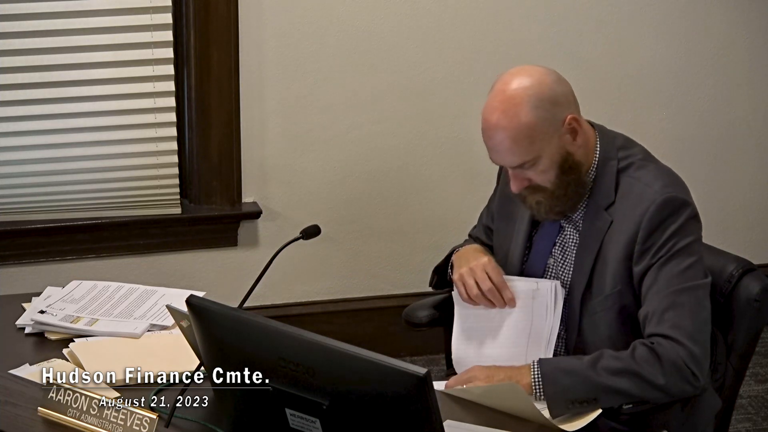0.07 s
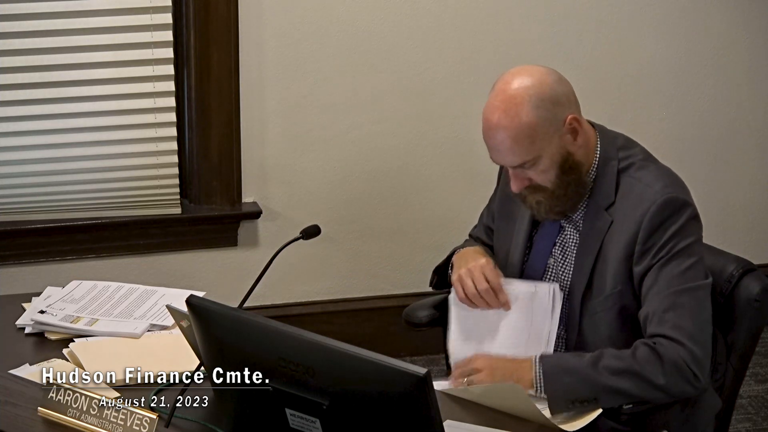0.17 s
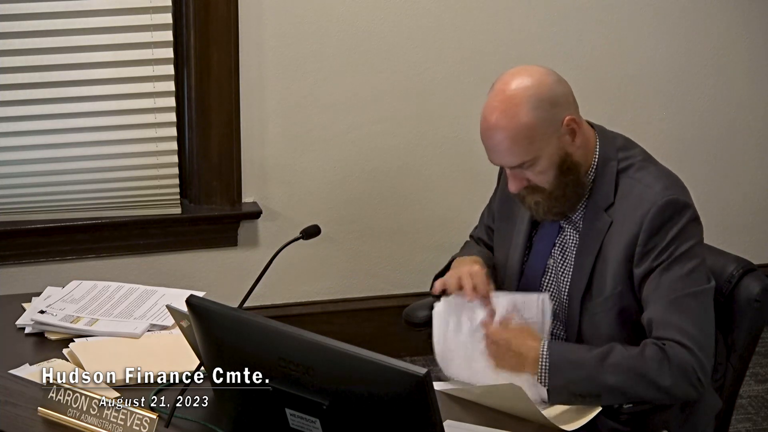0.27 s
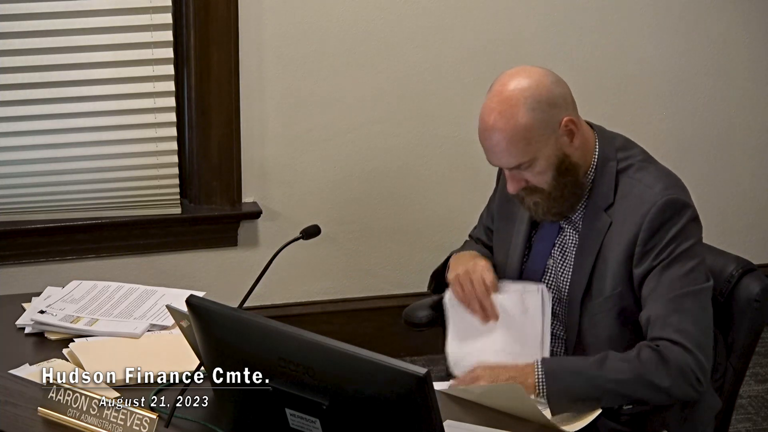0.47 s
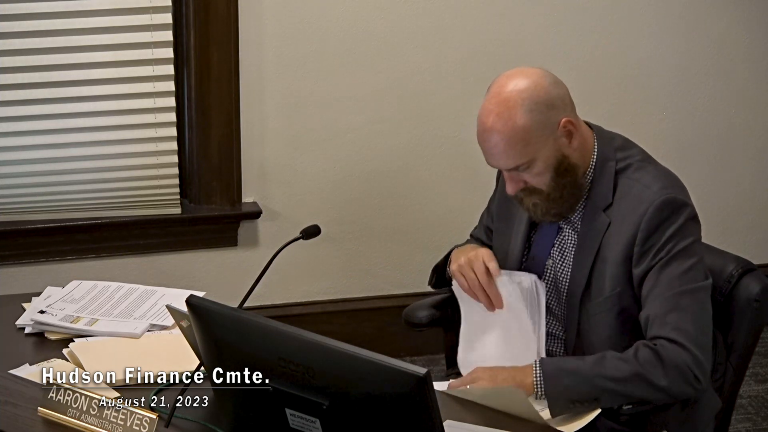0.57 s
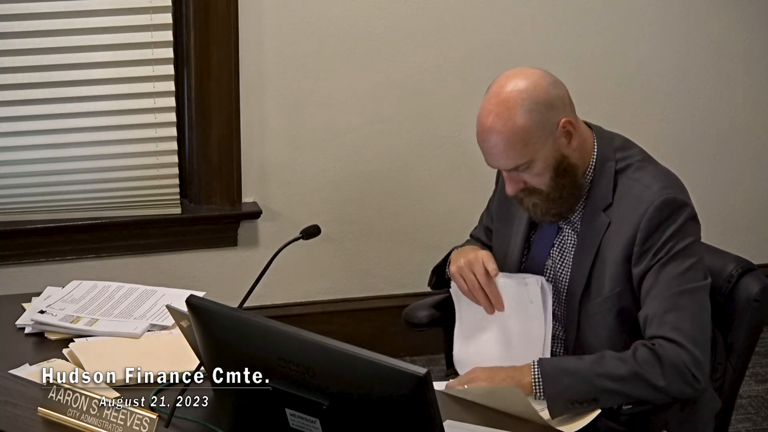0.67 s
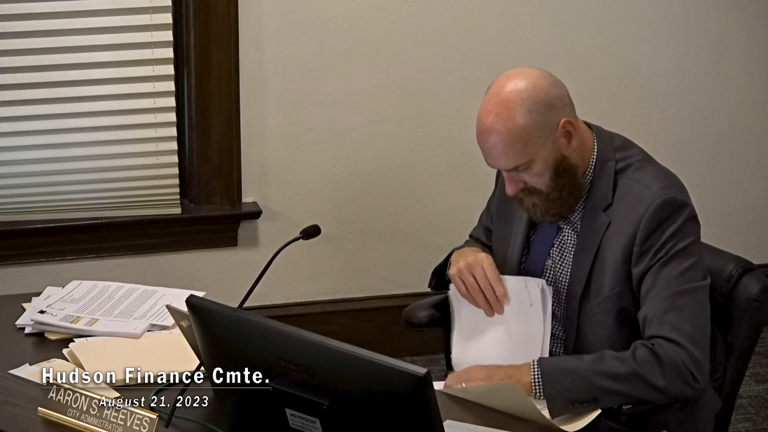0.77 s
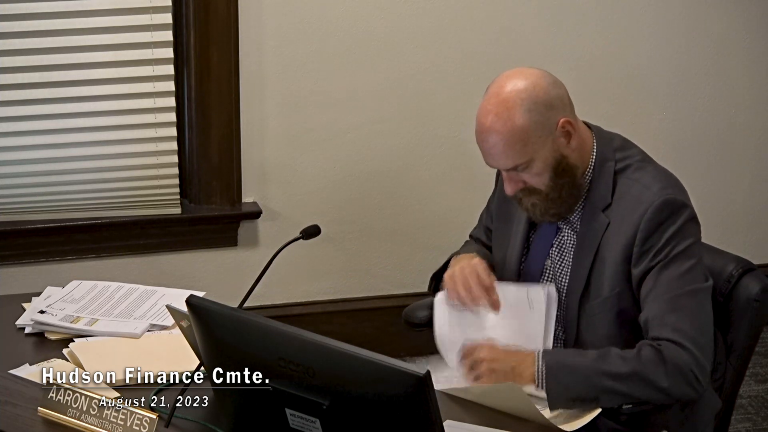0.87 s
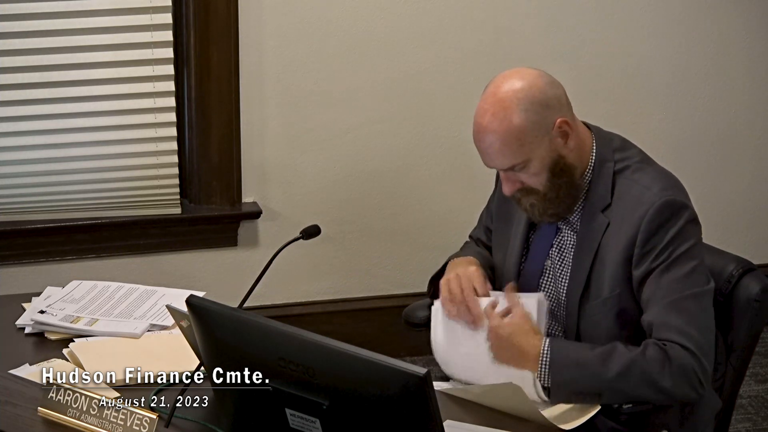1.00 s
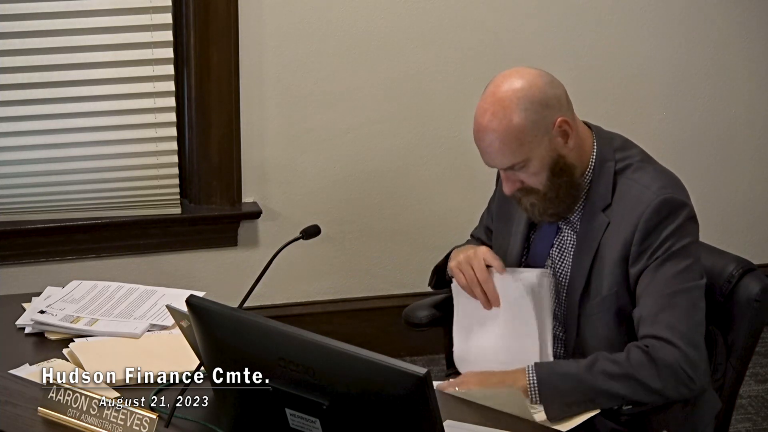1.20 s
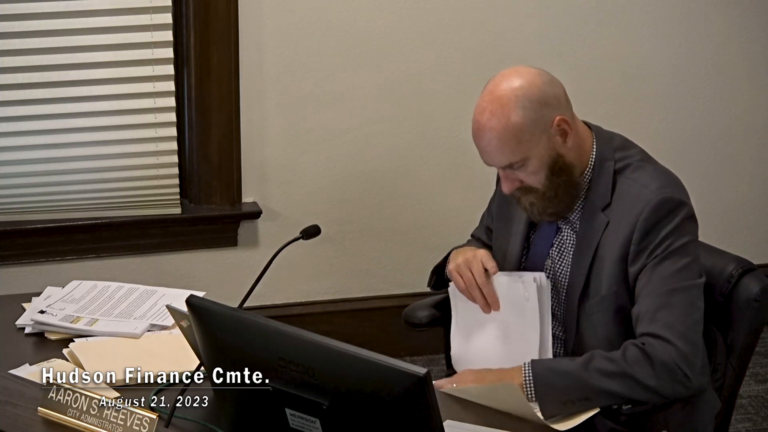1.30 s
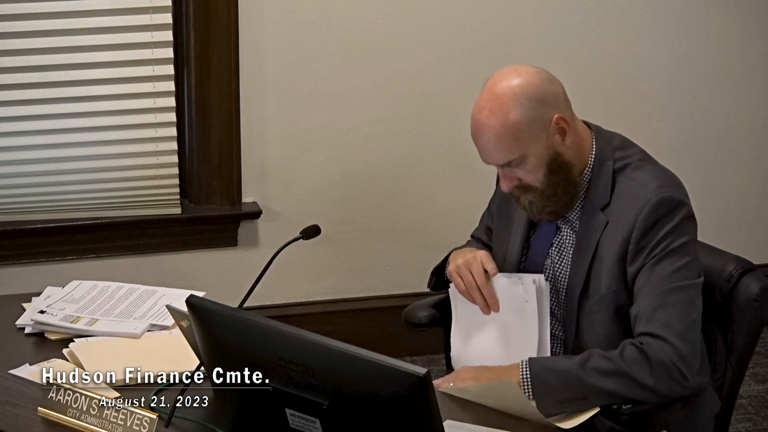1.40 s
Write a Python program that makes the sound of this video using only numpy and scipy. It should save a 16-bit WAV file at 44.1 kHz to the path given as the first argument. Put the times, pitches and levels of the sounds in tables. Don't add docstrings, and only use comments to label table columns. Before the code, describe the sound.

A stack of paper is leafed through by hand close to a desk microphone, crackling and snapping in a dense early burst, then a second burst around one second, with dull desk knocks in a quiet meeting room.

```python
import sys
import numpy as np
from scipy import signal
from scipy.fft import rfft, irfft
from scipy.io import wavfile
from scipy.ndimage import uniform_filter1d

SR = 44100
rng = np.random.default_rng(int(sys.argv[2]) if len(sys.argv) > 2 else 0)


def unload_wav(signal):
    wavfile.write(
        sys.argv[1],
        SR,
        np.round(np.clip(np.atleast_2d(signal).T, -1, 1) * 32767).astype(np.int16),
    )


def nominal_scale(level):
    x = np.asarray(level, float) / 20
    return 10 ** x


N = 63945


def evened(x):
    return x / np.sqrt(np.mean(x ** 2) + 1e-20)


def read(points, hz):
    f, value = np.transpose(points)
    return np.interp(np.log(hz + 1), np.log(f + 1), value)


def add(mix, s, sound):
    part = mix[round(s * SR):][:len(sound)]
    part += sound[:len(part)]


def coloured(x, points):
    edged = [(points[0][0] / 4, -60)] + list(points) + [(points[-1][0] * 1.6, -50)]
    gain = nominal_scale(read(edged, np.fft.rfftfreq(len(x), 1 / SR)))
    return evened(irfft(rfft(x) * gain, len(x)))


def resonate(x, hz, width):
    turn = np.exp(2j * np.pi * hz * np.arange(len(x)) / SR)
    r = np.exp(-np.pi * width / SR)
    return 2 * (turn * signal.lfilter([1 - r], [1, -r], x / turn)).real


def crackle(per_s, spread_db, share):
    draw = rng.random((N, 2))
    happens = draw[:, 0] < per_s / SR
    size = nominal_scale(-spread_db * np.log(draw[:, 1] + 0.05))
    slips = happens * size * rng.choice([-1., 1.], N)
    return share * evened(slips) + (1 - share) * rng.standard_normal(N)


def flicker(width_s, depth_db):
    size = max(int(width_s * SR), 2)
    smooth = uniform_filter1d(uniform_filter1d(rng.standard_normal(N), size), size)
    return nominal_scale(depth_db * evened(smooth))


def release(t, width_s):
    u = t / width_s
    return u * (2 - u) * np.exp(-u)


# frequency in Hz, density in dB per Hz.
AIR = [(12, -32), (20, -0.5), (77, -6.5), (146, -11.5), (242, -16.5), (488, -25.5), (1100, -41),
       (14100, -41), (16200, -50)]
# pitch in Hz, width in Hz, level in dB.
RUMBLE = [(58.3, 25, -48.5), (122.4, 28, -49)]


def air():
    out = nominal_scale(-47) * coloured(rng.standard_normal(N), AIR)
    for hz, width, db in RUMBLE:
        hum = resonate(resonate(rng.standard_normal(N), hz, width), hz, 2 * width)
        out = out + nominal_scale(db) * evened(hum)
    return out


# frequency in Hz, t60 in seconds.
ROOM = [(200, 0.9), (600, 0.14), (1500, 0.51), (8000, 0.16)]


def room(x):
    taps, at = np.zeros(SR // 2), np.arange(200, SR // 2 - 20, 20)
    taps[at + rng.integers(0, 20, len(at))] = rng.choice([-1., 1.], len(at))
    hz, t, z = signal.stft(taps, SR, nperseg=256)
    decay = nominal_scale(-60 * t / read(ROOM, hz)[:, None])
    tail = signal.istft(z * decay, SR, nperseg=256)[1]
    return signal.fftconvolve(x, tail / np.linalg.norm(tail))[:N]


# time in seconds, flex level in dB, slide level in dB.
HANDLING = [(.12, -58, -118), (0.167, -47, -47), (0.209, -46.5, -40), (.23, -37.5, -36.5),
            (0.298, -30, -34.5), (.36, -31.5, -48.5), (.45, -37, -41.5), (0.552, -36.5, -35.5),
            (.62, -40.5, -43.5), (0.703, -48, -64), (0.764, -51.5, -43.5), (0.808, -43, -39),
            (0.95, -50.5, -48), (0.99, -28, -45), (1.132, -37, -44), (1.202, -33, -37), (1.35, -45, -50.5),
            (1.45, -53, -52.5)]
# frequency in Hz, density in dB per Hz.
FLEX = [(59, -39), (100, -6.5), (312, -7.5), (530, 0.5), (738, -4.5), (1400, -5), (1560, -6.5), (8000, -26),
        (10400, -35), (17600, -120)]
# frequency in Hz, density in dB per Hz.
HISS = [(1470, -5.5), (2500, 5), (2880, 1), (3190, 1), (6340, 1.5), (11500, 1), (16200, -9.5)]


def rustle():
    s, flex_db, slide_db = np.transpose(HANDLING)
    t, shared = np.arange(N) / SR, flicker(0.011, 1.1)
    flex = coloured(crackle(per_s=900, spread_db=-0.5, share=0.37), FLEX) * flicker(0.01, 0.83)
    hiss = coloured(crackle(per_s=2000, spread_db=2.5, share=0.15), HISS) * flicker(0.0028, 2.1)
    flex = nominal_scale(np.interp(t, s, flex_db)) * flex
    hiss = nominal_scale(np.interp(t, s, slide_db)) * hiss
    return shared * (flex + hiss)


# start in seconds, length in seconds, level in dB.
PUSHES = [
    (0.213, 0.043, -31),
    (0.379, 0.057, -35.5),
    (0.522, 0.061, -39),
    (0.733, 0.1, -41),
    (0.842, 0.044, -36),
    (0.955, 0.046, -34.5),
    (1.149, 0.12, -34.5),
]


def pushes():
    out = np.zeros(N)
    for s, length, db in PUSHES:
        t = np.arange(0, length, 1 / SR)
        hz = 59.8 * rng.uniform(0.615, 1.205)
        sway = np.sin(2 * np.pi * (hz * t + rng.random()))
        add(out, s, nominal_scale(db) * np.sin(np.pi * t / length) * sway)
    return out


THUMP_S = [.266, .29, .294, .541, .962, .968, 1.2, 1.197, 1.275]
# level in dB, pitch in Hz, t60 in seconds.
THUMPS = [
    (-14.5, 825, 0.076),
    (-23, 150, 0.069),
    (-20.5, 208, 0.058),
    (-32, 260, 0.16),
    (-24.5, 129, 0.089),
    (-22.5, 233, 0.084),
    (-27.5, 380, 0.11),
    (-24, 540, 0.08),
    (-35, 149.6, 0.29),
]


def thumps():
    out, t = np.zeros(N), np.arange(0, 0.4, 1 / SR)
    onset = 1 - np.exp(-t / 0.003)
    for s, (db, hz, t60) in zip(THUMP_S, THUMPS):
        add(out, s, nominal_scale(db - 60 * t / t60) * onset * np.sin(2 * np.pi * hz * t))
    return out


# start in seconds, length in seconds, level in dB, first and last pitch in Hz.
WOBBLES = [
    (0.503, 0.042, -27.5, 132, 60.4),
    (.534, 0.049, -22.5, 135.6, 123),
    (1.158, 0.024, -18.5, 171, 182),
    (1.159, 0.011, -19.5, 299, 292),
    (1.179, 0.023, -19.5, 254, 287),
]


def wobbles():
    out = np.zeros(N)
    for s, length, db, first_hz, last_hz in WOBBLES:
        u = np.arange(0, length, 1 / SR) / length
        phase = 2 * np.pi * np.cumsum(first_hz + (last_hz - first_hz) * u) / SR
        add(out, s, nominal_scale(db) * np.sin(np.pi * u ** 1.1) * np.sin(phase))
    return out


SLIDE_S = [.297, .311, .356, .391, .49, .571, .785, .86, .967, 1.033, 1.06, 1.115, 1.165, 1.42]
# length in seconds, level in dB, centre in Hz.
SLIDES = [(0.022, -24.5, 11500), (0.0036, -22, 20000), (0.0098, -22.5, 3600), (0.028, -32.5, 7200),
          (0.019, -37, 8400), (0.0173, -25.5, 5230), (0.031, -35, 3300), (0.025, -43.5, 8100),
          (0.035, -31.5, 8300), (0.0059, -28.5, 10400), (0.036, -41.5, 10000), (0.036, -41, 9500),
          (0.049, -39.5, 7200), (.03, -44, 8900)]


def slides():
    drive, out = crackle(per_s=6000, spread_db=3.0, share=0.15), np.zeros(N)
    for s, (length, db, hz) in zip(SLIDE_S, SLIDES):
        t = np.arange(0, min(length, N / SR - s - 0.001), 1 / SR)
        at, width = round(s * SR), hz / 1.2
        swell = np.minimum(t / (0.28 * length), 1)
        stop = np.minimum((length - t) / 0.0012, 1)
        hiss = resonate(resonate(drive[at:at + len(t)], hz, width), hz, width)
        add(out, s, nominal_scale(db - 30.0 * t) * swell * stop * evened(hiss))
    return out


BUCKLE_S = [.199, .2655, .269, .283, .283, .297, .302, .323, .33, .345, .359, .391, .395, .418, .434]
BUCKLE_S_LATE = [.576, .5975, .598, .793, .805, .9665, .973, .975, 1.007, 1.008, 1.039, 1.047, 1.0845,
                 1.163, 1.181, .762, .893, .926, .84, 1.243, 1.085, 1.006, .462]
# length in seconds, level in dB, pitch in Hz.
BUCKLES = [(0.019, -32, 1500), (0.0084, -18.5, 890), (0.0053, -22, 1400), (0.0052, -21.5, 1000),
           (0.0025, -18, 2370), (0.0108, -20, 364), (0.0077, -16, 1600), (0.032, -17.5, 1560),
           (0.0326, -31, 370), (0.0081, -34, 1700), (0.014, -18, 1840), (0.0154, -21, 590),
           (0.0163, -15.5, 2180), (0.01, -18, 1400), (0.0031, -21.5, 1900), (0.035, -28, 2800),
           (0.0094, -18.5, 1680), (0.015, -34, 570), (0.029, -31.5, 1600), (0.0087, -34, 480),
           (0.0049, -14, 566), (0.024, -17.5, 1200), (0.02, -22, 1730), (0.02, -18, 1050),
           (0.0065, -29, 1400), (0.0026, -23.5, 930), (0.0075, -17, 1140), (0.0166, -21.5, 1260),
           (0.046, -23, 500), (0.0316, -29.5, 1900), (0.0225, -37, 1530), (0.024, -35.5, 770),
           (0.011, -39.5, 700), (.014, -37, 520), (0.024, -30, 510), (0.022, -27, 610), (0.0077, -27, 1500),
           (0.0265, -33, 430)]


def buckles():
    drive, out = crackle(per_s=3000, spread_db=5.0, share=0.45), np.zeros(N)

    def ring(slips, hz):
        width = hz / 1.565
        return evened(resonate(resonate(slips, hz, width), hz, 2 * width))

    for s, (length, db, hz) in zip(BUCKLE_S + BUCKLE_S_LATE, BUCKLES):
        t, at = np.arange(0, length + 0.012, 1 / SR), round(s * SR)
        rise, fade = np.minimum(t / 0.0028, 1), nominal_scale(-5 * t / length)
        let_go = np.clip((length - t) / 0.003 + 1, 0, 1)
        slips = rise * fade * let_go * drive[at:at + len(t)]
        panel, bow = ring(slips, hz), ring(slips, 0.45 * hz)
        add(out, s, nominal_scale(db - 8.5) * (panel + nominal_scale(-13) * bow))
    return out


# centre in seconds, peak in dB, pitch in Hz.
POPS = [(0.2122, -17.9, 9210), (0.2125, -17.9, 5490), (0.2125, -17.7, 2320), (0.2713, -19.8, 1380),
        (0.2722, -16.9, 820), (0.2837, -18.9, 3000), (0.2861, -17.7, 1160), (0.2995, -22.6, 10040),
        (0.3021, -20.9, 3890), (0.3021, -18.7, 1950), (0.3024, -20.5, 7110), (0.3054, -23.7, 10940),
        (0.3072, -19.1, 10940), (0.3074, -17.6, 2320), (0.3132, -20.6, 13000), (0.3161, -16.5, 10940),
        (0.3178, -12.7, 11930), (0.3331, -19.1, 2530), (0.3333, -25.4, 10940), (0.3507, -18.0, 1950),
        (0.3626, -20.1, 3890), (0.3633, -16.6, 2320), (0.3659, -17.1, 1950), (0.3908, -24.4, 9210),
        (0.3918, -19.5, 4620), (0.3922, -18.6, 1640), (0.3988, -16.8, 3270), (0.4013, -20.9, 3570),
        (0.4014, -17.4, 2130), (0.4033, -23.6, 5030), (0.4071, -24.2, 13000), (0.4209, -16.9, 1950),
        (0.4233, -19.3, 2320), (0.481, -25.9, 10940), (0.5283, -22.7, 7750), (0.58, -22.2, 6520),
        (0.5828, -25.0, 7750), (0.5856, -22.5, 7750), (0.5988, -18.7, 1950), (0.602, -18.6, 2130),
        (0.9683, -18.1, 980), (0.9769, -18.5, 1270), (0.978, -21.2, 2320), (0.9814, -18.6, 4620),
        (0.9835, -19.7, 1160), (1.0097, -19.0, 1160), (1.0099, -19.2, 2750), (1.0139, -19.6, 1510),
        (1.0192, -19.5, 1270), (1.036, -23.5, 10040), (1.04, -23.7, 5030), (1.0402, -15.4, 1640),
        (1.0475, -26.0, 11930), (1.0497, -20.2, 1510), (1.1902, -24.9, 9210), (1.2515, -16.2, 11930)]


def pops():
    out = np.zeros(N)
    for s, db, hz in POPS:
        width = 1.1 / hz
        t = np.arange(-3 * width, 3 * width, 1 / SR)
        swell = np.exp(-0.5 * (t / width) ** 2)
        add(out, s + t[0], nominal_scale(db + 2.53) * swell * np.cos(2 * np.pi * hz * (t + s)))
    return out


# start in seconds, peak in dB, width in seconds.
CRACKS = [
    (0.23, -8, 0.000087),
    (1.0397, -4, 0.000099),
    (0.59, -13, 0.00004),
]


def cracks():
    out = np.zeros(N)
    for s, db, width in CRACKS:
        u = np.arange(0, 12 * width, 1 / SR)
        add(out, s, 2 * nominal_scale(db) * release(u, width))
    return out


SNAP_S = [.0935, .2117, .2985, .3176, .3242, .3328, .3608, .3912, .4068, .4188, .435, .4808, .5275]
SNAP_S_LATE = [.542, .6085, .842, .893, .9662, .9808, 1.0392, 1.0468, 1.0855, 1.119, 1.182, 1.2505]
# peak in dB, length in seconds, brightness of the top band in dB.
SNAPS = [(-44.5, 0.0016, 14), (-9, 0.0031, 2.5), (-10, 0.0042, -6), (-13.5, 0.0015, 12.5),
         (-9, 0.00033, -1), (-16, 0.0011, 7), (-17.5, 0.0032, 1), (-5, 0.0046, -11), (-25.5, 0.0017, 14.5),
         (-13, 0.0019, -15), (-23, 0.0022, 3), (-21.5, 0.001, 11.5), (-23, 0.0032, 7.5),
         (-13.5, 0.0031, -12), (-14.5, 0.0028, -17), (-40, 0.0032, 13), (-45, 0.0026, 5), (-16, 0.003, 4),
         (-6.5, 0.003, -9), (-20, 0.0014, -6), (-21, 0.00064, 12), (-12, 0.0012, -13),
         (-14.5, 0.0018, -5.5), (-12.5, 0.0033, -3.5), (-17, 0.0023, 11.5)]
# frequency in Hz, level in dB.
SNAP = [(450, -47), (900, 4.5), (2300, 5), (4000, -2), (6000, -10.5)]
# frequency in Hz, level in dB.
SNAP_TOP = [(2500, -17.5), (4500, -12), (9000, -5.5), (13000, -12.5), (16000, -18)]


def snaps():
    drive, out = rng.standard_normal(N), np.zeros(N)
    body, top = coloured(drive, SNAP), coloured(drive, SNAP_TOP)
    for s, (db, length, top_db) in zip(SNAP_S + SNAP_S_LATE, SNAPS):
        t, at = np.arange(0, 3 * length, 1 / SR), round(s * SR)
        shape = np.minimum(t / 0.00058, 1) * np.exp(-(t / length) ** 2 * 1.5)
        kick = nominal_scale(-4.5) * evened(release(t, 0.00017)) * np.sign(drive[at])
        crack = evened(shape * body[at:at + len(t)])
        edge = nominal_scale(top_db) * evened(shape * top[at:at + len(t)])
        add(out, s, nominal_scale(db - 20.0) * (kick + crack + edge))
    return out


def desk_bounce(x):
    out = x.copy()
    add(out, 0.000946, nominal_scale(-9.5) * x)
    return out


# pitch in Hz, width in Hz, level in dB.
STACK = [(571, 50, -3), (428, 52, 0), (360.6, 15, 2.5)]


def pile(x):
    return sum(nominal_scale(db) * resonate(x, hz, width) for hz, width, db in STACK)


def scene():
    creases = desk_bounce(snaps() + cracks())
    sheets = buckles() + slides()
    desk = thumps() + pushes() + wobbles()
    paper = creases + sheets + desk + pops()
    steady = rustle()
    ringing = pile(paper + 0.28 * steady)
    return (paper + ringing + nominal_scale(-16.5) * room(paper) + steady + air())[None]


def band_limit(x):
    return signal.sosfilt(signal.butter(12, 16630, fs=SR, output="sos"), x)


def record(dry):
    hz = np.fft.rfftfreq(N, 1 / SR)
    gain = np.where(hz < 15780, 1, nominal_scale(-38) * (hz < 16500))
    limited = irfft(rfft(dry) * gain, N)
    return band_limit(limited)


dry = scene()
out = record(dry)
unload_wav(out)
```